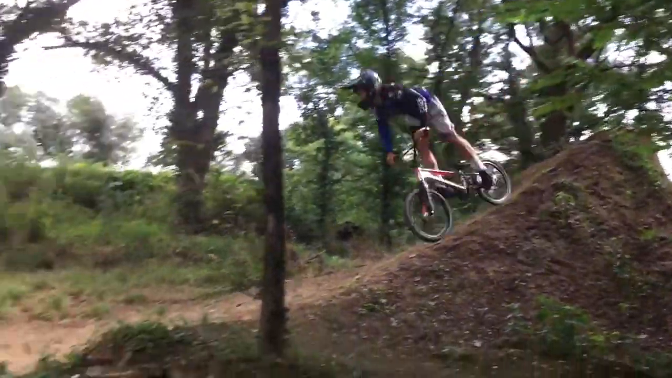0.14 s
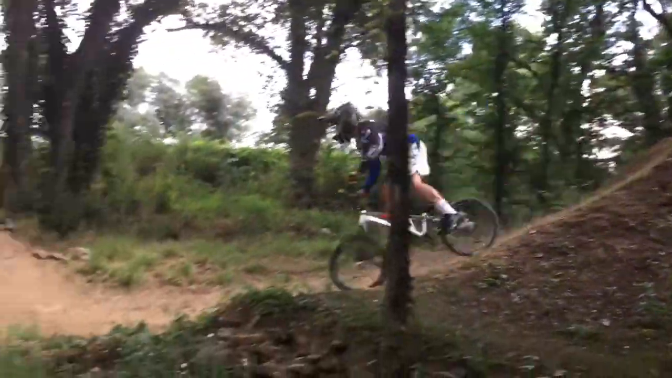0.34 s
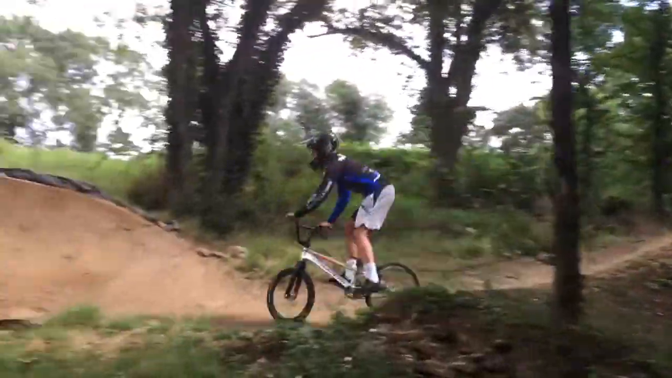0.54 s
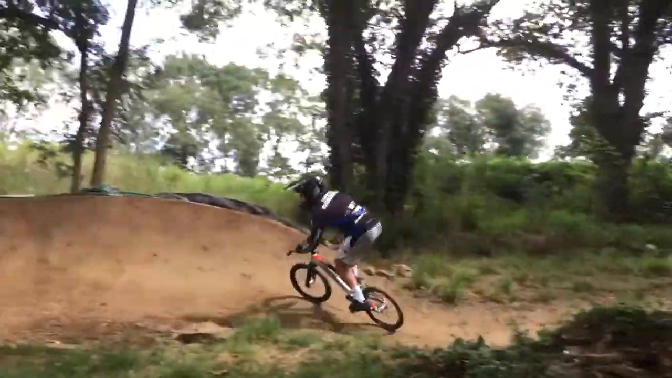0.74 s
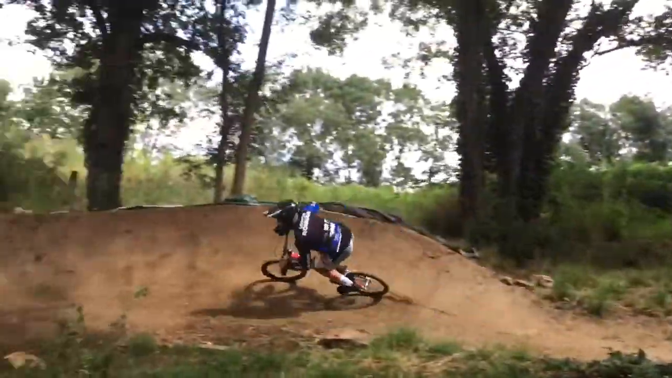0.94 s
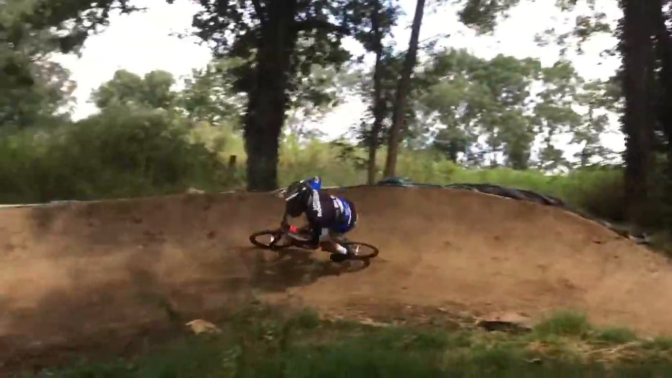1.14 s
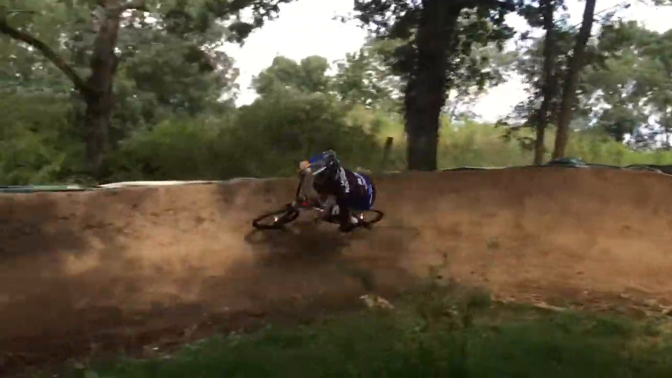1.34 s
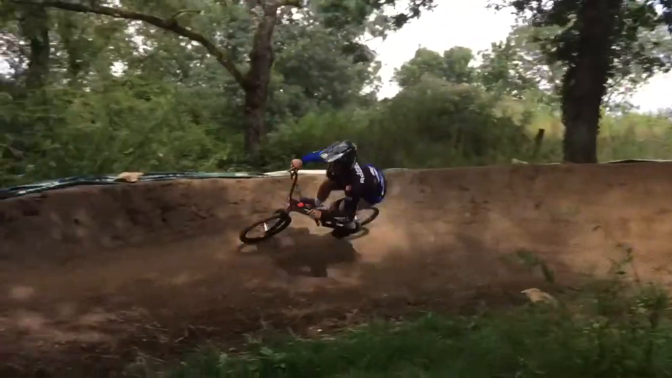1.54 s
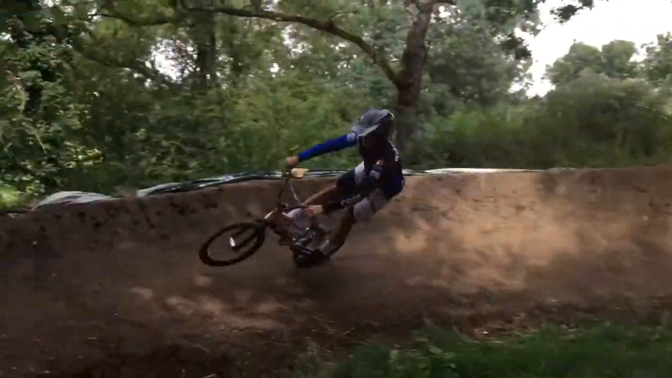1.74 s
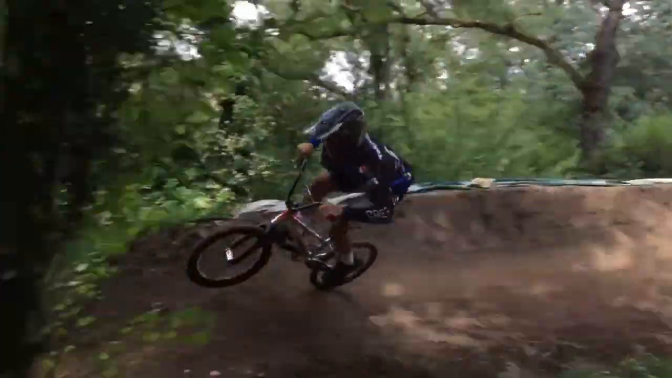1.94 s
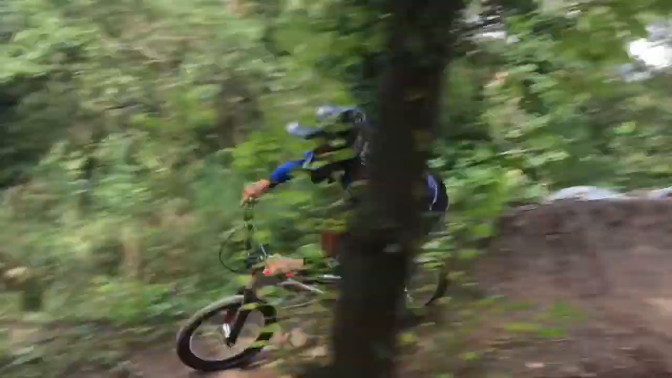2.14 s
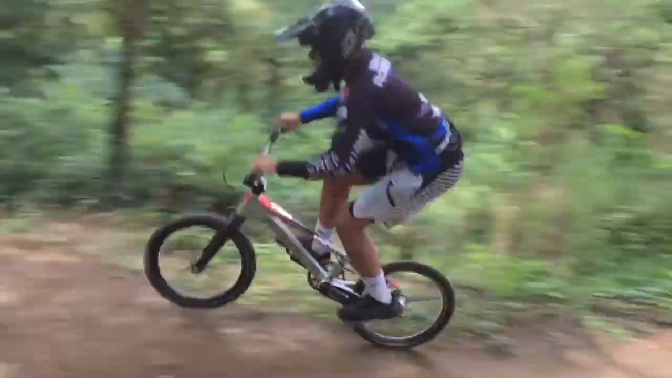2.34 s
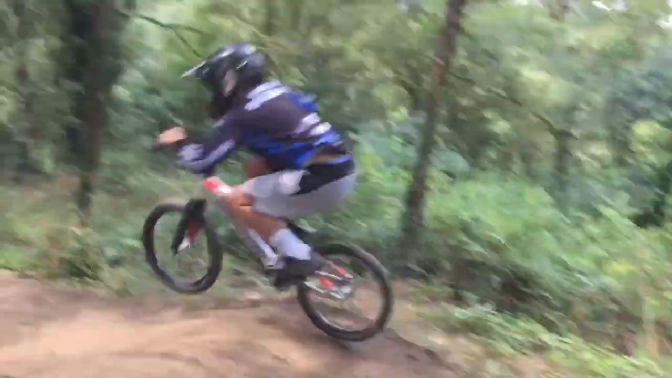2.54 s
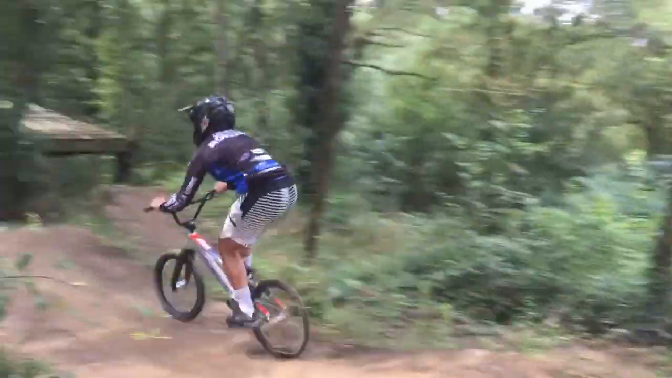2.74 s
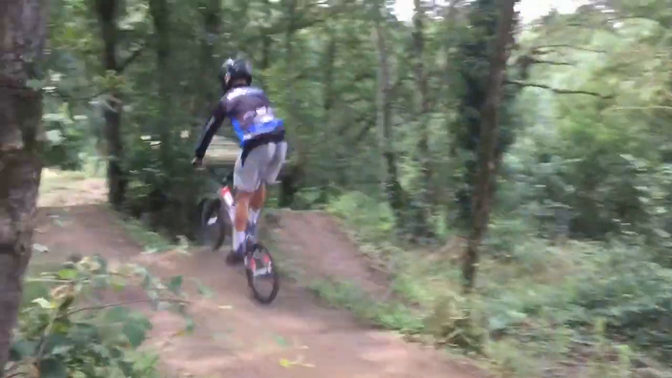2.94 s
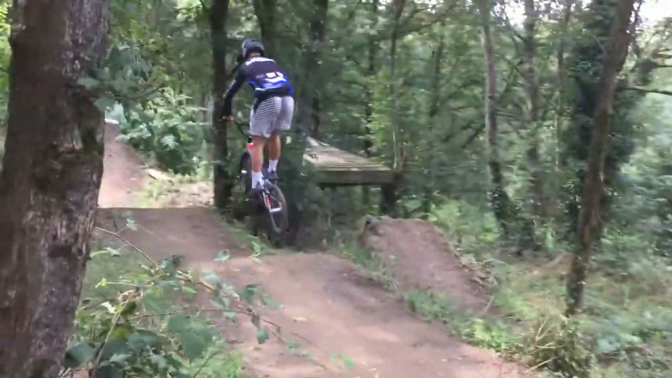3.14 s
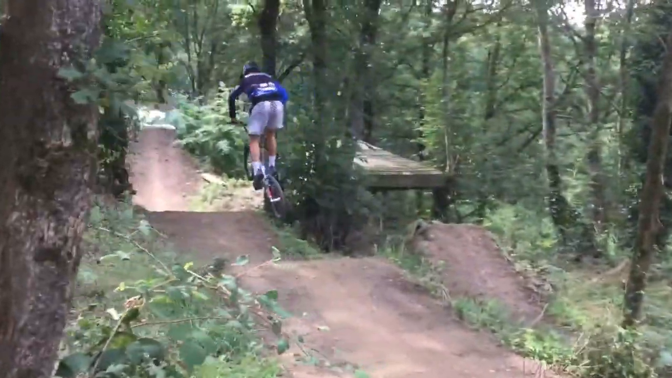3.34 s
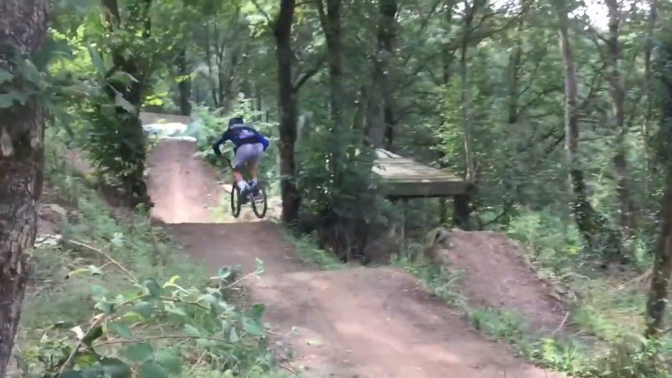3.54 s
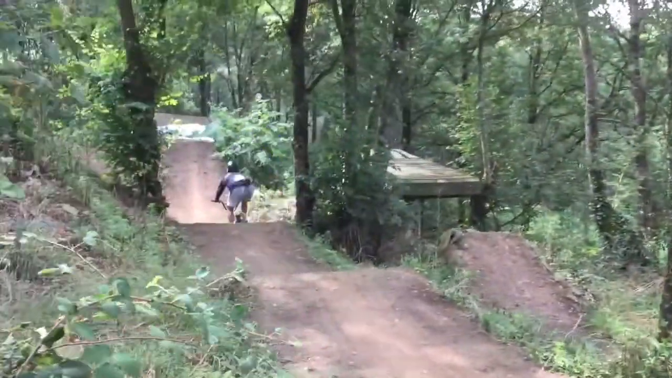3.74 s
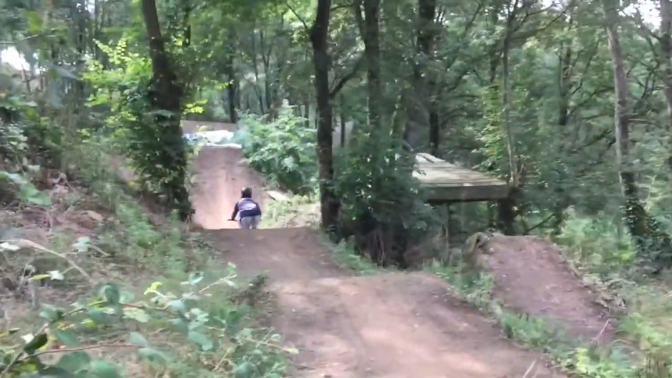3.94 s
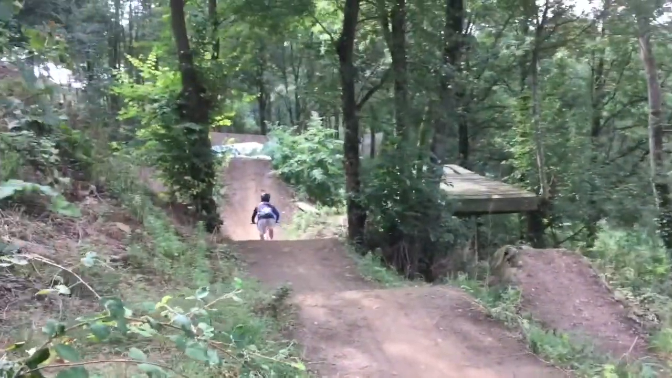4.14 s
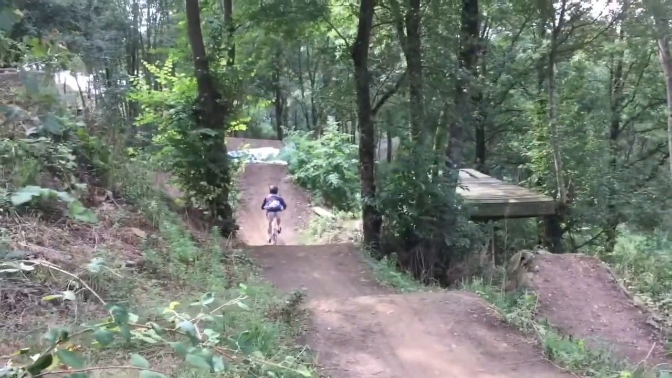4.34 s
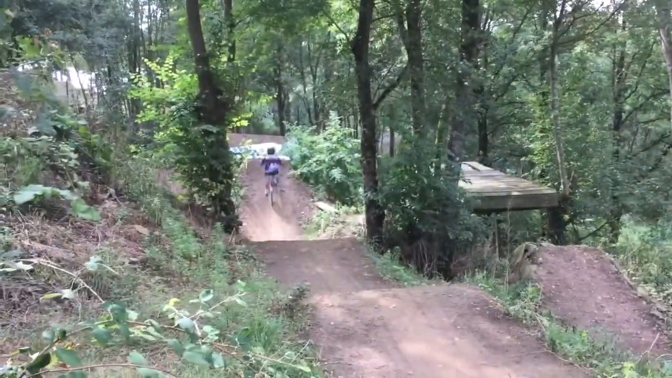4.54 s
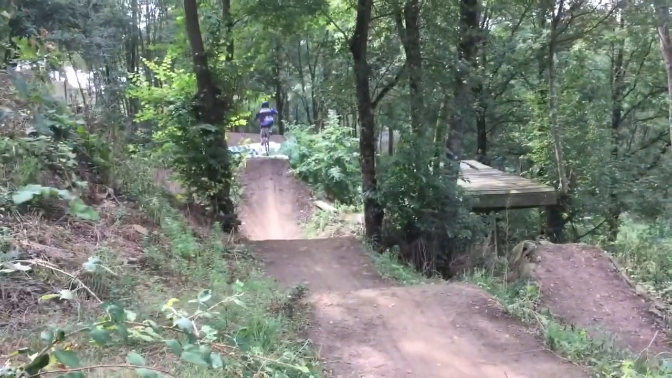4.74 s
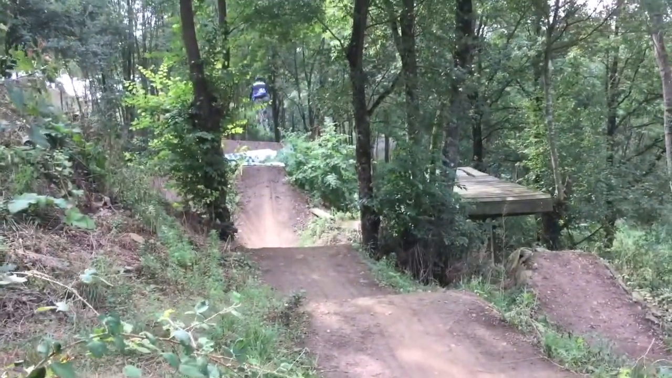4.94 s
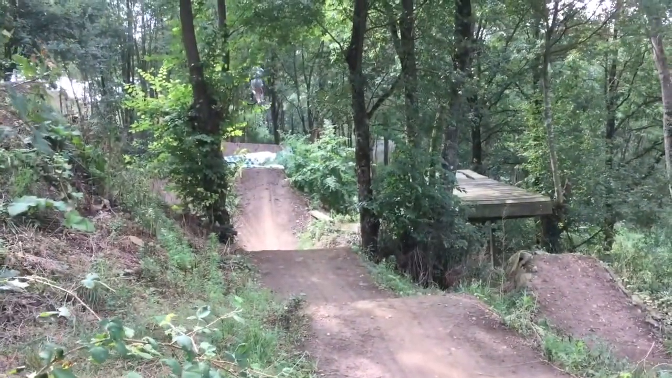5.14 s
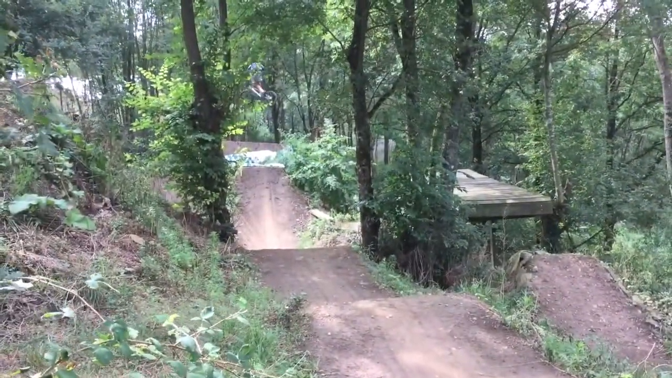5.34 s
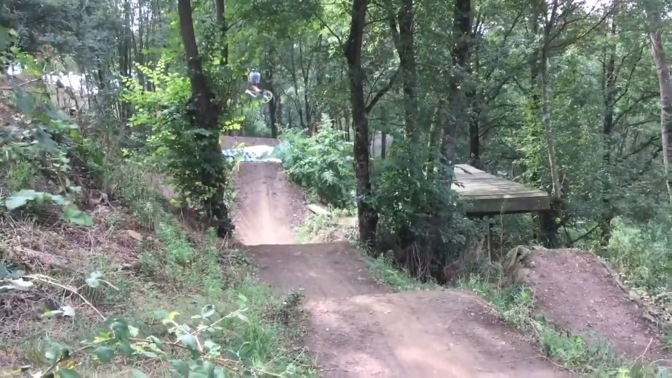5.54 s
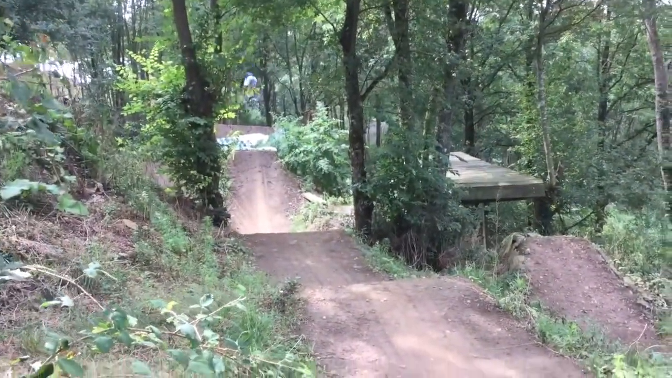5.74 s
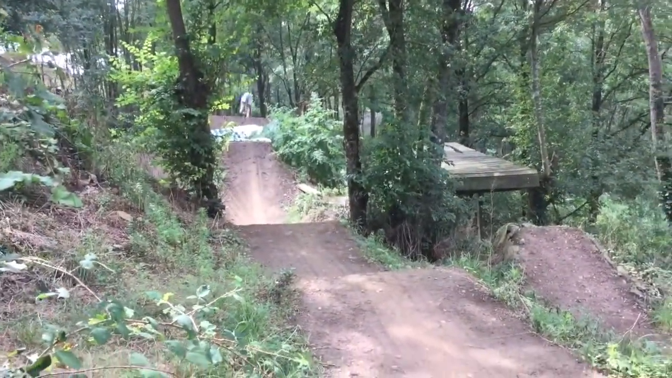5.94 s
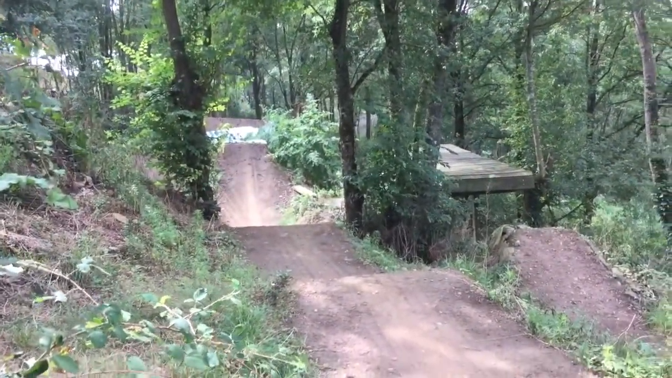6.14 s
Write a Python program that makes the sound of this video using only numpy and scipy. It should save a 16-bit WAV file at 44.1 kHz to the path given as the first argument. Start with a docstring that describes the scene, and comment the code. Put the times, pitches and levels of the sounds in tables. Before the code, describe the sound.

In a quiet wood, a mountain bike approaches with a faint freewheel buzz, lands with a low thud, and rumbles over packed dirt as chain and frame knock. It surges past the close microphone with bright ratcheting and gritty hiss, touches down again more faintly as it leaves, then fades away. Near silence follows, with small dry snaps and a final growing rustle.

```python
"""A mountain bike coasts in on a buzzing freewheel, its chain rattling, over the quiet of a wood.
It lands, and the tyres rumble on the ground in a broad hiss, strongest as they crunch over grit; bumps
knock the chain and frame, and low thuds swell throughout. It carves a packed-dirt berm, passes close
and coasts away over jumps. Late on something snaps close by, and a rustle grows. Random contacts ring
resonances for most sources; the woods are coloured noise, and the thuds add a low sine to such rings."""
import sys
import numpy as np
from scipy import signal
from scipy.fft import rfft, irfft
from scipy.io import wavfile
from scipy.ndimage import map_coordinates

SR = 44100
rng = np.random.default_rng(int(sys.argv[2]) if len(sys.argv) > 2 else 0)


def dump(signal):
    """Clip the signal to [-1, 1] and save it as 16-bit WAV at the path in sys.argv[1]."""
    limited = np.clip(np.atleast_2d(signal).T, -1, 1)
    pcm = np.round(limited * 32767).astype(np.int16)
    wavfile.write(sys.argv[1], SR, pcm)


def natural_amplitude(level_db):
    """Convert a level in decibels to a linear amplitude factor, elementwise."""
    exponent = np.asarray(level_db, float) / 20
    return 10 ** exponent


N = 276903   # length in samples

# chain and frame knocks: (time [s], strike level [dB], middle modes [dB], high modes [dB])
KNOCK_HITS = [(0.203, -34.5, -18, -16), (0.245, -35, 2, -1), (0.265, -29, -6, -13),
              (0.283, -29.5, -11, -24), (0.437, -50, -22, -14), (0.499, -40, -24, -13.5),
              (0.6, -30, -18, -12), (0.619, -43, -4, -7), (0.669, -46, -16, -19), (0.961, -31.5, -17, -10),
              (1.36, -36, -9.5, -8), (1.429, -25.5, -9.5, -25), (1.523, -28.5, -18, -23),
              (1.587, -39, -14, -16), (1.731, -24, -6.5, -27), (1.736, -31.5, -22, -23),
              (1.948, -32.5, -11, -7), (2.008, -31, -20, -18), (2.099, -37, -19, -16.5),
              (2.191, -33, -3, 3), (2.214, -29.5, -4, -16), (2.285, -27.5, -5, -21), (2.296, -24, -10, -22),
              (2.771, -40, -17, -15), (2.787, -29, 1, -18), (3.131, -35.5, -4, -12), (3.232, -39, -9, -10),
              (3.431, -46, -10, -5), (3.447, -42, -2, 7), (3.763, -30.5, -11, -24),
              (3.778, -39.5, 2.5, -13), (3.789, -39.5, -5, -17), (3.802, -43, -10, -17),
              (4.064, -51, 2, -7), (4.368, -52, -20, -3), (4.597, -54, -17, 10.5), (5.687, -68, -2.5, -17),
              (5.731, -68, -1, -14.5)]
# frame tubes and chain guard: (frequency [Hz], width of each pass [Hz], relative level [dB])
FRAME_MODES = [(620, 780, -46), (840, 295, -2), (1021, 340, -1.5), (1300, 440, -5.5), (1566, 150, -6),
               (1993, 430, 3), (2180, 400, -27), (3150, 380, 2), (3550, 540, -6.5)]


def rms_one(x):
    """Scales a signal to unit power."""
    return x / np.sqrt(np.mean(x ** 2) + 1e-20)


def in_time(rows):
    """Draws each table column as a curve over all samples."""
    s, *columns = np.transpose(rows)
    return [np.interp(np.arange(N) / SR, s, column) for column in columns]


def drift(rate_hz):
    """Slow random wander of rms 1: noise through two equal poles, made at every 40th sample."""
    r = np.exp(-80 * np.pi * rate_hz / SR)
    noise = rng.standard_normal(N // 40 + 2002)
    slow = signal.lfilter([1], [1, -2 * r, r * r], noise)[2000:]   # drops the filter's start
    return np.interp(np.arange(N) / 40, np.arange(len(slow)), rms_one(slow))


def resonance(x, hz, width_hz):
    """Two-pole resonance with gain 1 at its peak."""
    r = np.exp(-np.pi * width_hz / SR)
    poles = [1, -2 * r * np.cos(2 * np.pi * hz / SR), r * r]
    return signal.lfilter([(1 - r * r) / 2, 0, (r * r - 1) / 2], poles, x)


def steep(x, hz, width_hz):
    """A resonance passed twice: soft start, dark flanks."""
    return resonance(resonance(x, hz, width_hz), hz, width_hz)


def body(modes, per_s, spread_db, patchy_db, flicker_hz, ring=resonance, turn=-1):
    """Random contacts ring a set of modes; each swells and fades mostly by itself. Rms 1."""
    sizes = natural_amplitude(spread_db * np.minimum(rng.exponential(1, N), 5)) * rng.choice([-1, 1], N)
    contacts = sizes * (rng.random(N) < per_s / SR) + 1e-18
    together = .3 * drift(flicker_hz)   # the part of the swelling that all modes share
    total = np.zeros(N)
    for k, (hz, width_hz, db) in enumerate(modes):
        gain = natural_amplitude(db + patchy_db * (together + drift(flicker_hz)))
        total += turn ** k * gain * ring(contacts, hz, width_hz)   # turn -1 alternates polarity
    return rms_one(total)


def freewheel(gain_db):
    """Pawls snap over the ratchet too fast to count; motion shifts the pitch of the ringing hub."""
    # hub shell and spokes before the shift: (frequency [Hz], width [Hz], relative level [dB])
    hub_modes = [(2585, 83, -1.5), (3280, 200, -1), (3920, 560, -0.5), (4474, 350, -2), (5380, 470, -6),
                 (6908, 190, 1.5), (8230, 720, -10), (9680, 1300, -12.5), (11080, 520, -4.5),
                 (11950, 940, -7.5), (14200, 450, -0.5), (15200, 1300, -7), (16550, 1300, -6)]
    # gain of the lower rings, as the treble fades faster with distance: (time [s], gain [dB])
    low_ring_gain = [(0, 2), (0.3, -0.5), (1.5, -1), (2.4, 0), (3.2, -4.5), (3.8, 2.5), (4.3, 4.5),
                     (4.85, 8.5), (5.5, 6.5), (6.0, 3)]
    # speed towards the listener: (time [s], speed [m/s])
    closing_speed = [(0, 4.5), (1.2, 3.5), (2.3, 6), (2.9, -3.5), (4.2, -4.5), (6.28, 0)]
    buzz = body(hub_modes, per_s=9000, spread_db=2.0, patchy_db=1.4, flicker_hz=12.0)
    # a small shell sends out no lows
    buzz = signal.sosfilt(signal.butter(2, 1900, "high", fs=SR, output="sos"), buzz)
    lows = signal.sosfilt(signal.butter(1, 4800, fs=SR, output="sos"), buzz)
    buzz = buzz + (natural_amplitude(in_time(low_ring_gain)[0]) - 1) * lows
    # Doppler: the buzz is read faster when closing in, slower when leaving
    reading = np.cumsum(1 + in_time(closing_speed)[0] / 343) % (N - 2)
    return natural_amplitude(gain_db) * map_coordinates(buzz, [reading], order=5)


def rattle(freewheel_db):
    """The slack chain taps the frame at random and rings its lower modes, in step with the freewheel gain."""
    taps = body(FRAME_MODES[1:6], per_s=160, spread_db=3.0, patchy_db=3.0, flicker_hz=10.0,
                ring=steep, turn=1)
    return natural_amplitude(freewheel_db - 15) * taps


def thudding(cavity_db):
    """A low swing of wandering pitch with a little rough noise; each thud swells and fades as a bell."""
    # rough low noise: (frequency [Hz], width [Hz], relative level [dB])
    rough_modes = [(44, 89, 0.5), (108, 134, -6.5)]
    # single thuds: (peak time [s], level [dB], half length to 1/e [s])
    thud_bells = [(0.0, -61, 0.068), (0.115, -59, 0.033), (0.2, -47, 0.012), (0.267, -39.5, 0.024),
                  (0.433, -48.5, 0.018), (0.563, -51.5, 0.029), (0.65, -54, 0.034), (0.77, -55, 0.016),
                  (0.857, -56, .05), (1.055, -56, 0.043), (1.21, -53, .02), (1.272, -46, 0.013),
                  (1.41, -54, 0.03), (1.8, -55, 0.042), (1.853, -52, 0.015), (2.115, -46.5, 0.017),
                  (2.236, -34, 0.022), (2.336, -44.5, 0.022), (2.597, -71, 0.035), (2.78, -45.5, 0.018),
                  (2.87, -55, 0.02), (3.874, -50, 0.018), (4.06, -62, 0.027), (4.353, -64, 0.057),
                  (4.625, -64, .04), (4.79, -64, 0.021), (4.902, -58.5, 0.021), (5.023, -56, 0.017),
                  (5.453, -53, 0.022), (5.54, -61, .02), (5.602, -54.5, 0.022), (5.993, -67.5, .03),
                  (6.078, -65, 0.02), (6.152, -51, 0.0081), (6.173, -50.5, 0.014), (6.21, -58, .02),
                  (6.264, -46, .01)]
    pitch_hz = 76 * (1 + .07 * drift(4.3))
    swing = np.sqrt(2) * np.sin(2 * np.pi * np.cumsum(pitch_hz) / SR)
    rough = body(rough_modes, per_s=300, spread_db=2.5, patchy_db=1.5, flicker_hz=5.0)
    t = np.arange(N) / SR
    level = sum(natural_amplitude(db) * np.exp(-((t - s) / half) ** 2) for s, db, half in thud_bells)
    # between them small random lumps follow the rolling tyres
    level = level + natural_amplitude(cavity_db - 20.5 + 5.5 * drift(4.8))
    return level * rms_one(swing + .6 * rough)


def woods():
    """Leaves and far traffic: coloured noise with a slight slow swell."""
    # spectrum of the background: (frequency [Hz], relative level [dB])
    woods_colour = [(21, -32), (35, 1.5), (139, -9), (166, -14), (365, -18), (1040, -19), (1120, -20),
                    (15500, -38.5)]
    hz = np.maximum(np.fft.rfftfreq(N, 1 / SR), 1)
    table_hz, table_db = np.transpose(woods_colour)
    colour = natural_amplitude(np.interp(np.log(hz), np.log(table_hz), table_db))
    noise = rms_one(irfft(rfft(rng.standard_normal(N)) * colour, N))
    return natural_amplitude(-70 + .7 * drift(0.49)) * noise


def tyres(tread_db, cavity_db, hiss_db):
    """Knobs drum the casing and its air and scuff sideways, under a broad hiss of dense contacts."""
    # knobbly tyre on dirt: (frequency [Hz], width of each pass [Hz], relative level [dB])
    tread_modes = [(507, 144, 3.5), (605, 166, 9.5), (865, 209, 7.5), (1004, 290, 2)]
    # side knobs sliding: (frequency [Hz], width of each pass [Hz], relative level [dB])
    scuff_modes = [(1465, 370, 7), (1810, 163, 6)]
    # air in the tyre: (frequency [Hz], width [Hz], relative level [dB])
    cavity_modes = [(140, 67, -4.5), (197.5, 27.4, 2), (263, 110, -8)]
    # broad hiss: (frequency [Hz], width of each pass [Hz], relative level [dB])
    hiss_modes = [(2464, 2950, 7), (3700, 3050, -1), (6330, 8900, -6)]
    tread = body(tread_modes, per_s=2200, spread_db=3.2, patchy_db=1.5, flicker_hz=16.0,
                 ring=steep, turn=1)
    scuff = body(scuff_modes, per_s=2500, spread_db=3.2, patchy_db=1.5, flicker_hz=16.0,
                 ring=steep, turn=1)
    cavity = body(cavity_modes, per_s=700, spread_db=2.0, patchy_db=1.5, flicker_hz=8.0)
    hiss = body(hiss_modes, per_s=7000, spread_db=2.5, patchy_db=1.3, flicker_hz=12.0,
                ring=steep, turn=1)
    shake = jolts()
    tread_db = tread_db + 1.2 * drift(5.8)   # uneven ground makes the rumble swell and sink
    drumming = (natural_amplitude(tread_db) + natural_amplitude(-23.5) * shake) * tread
    sliding = (natural_amplitude(tread_db - 12) + natural_amplitude(-14.5) * shake) * scuff
    hissing = (natural_amplitude(hiss_db) + natural_amplitude(-18.5) * shake) * hiss
    return drumming + sliding + natural_amplitude(cavity_db) * cavity + hissing


def jolts():
    """Every knock also shakes the tyres: a short envelope that rises fast and dies."""
    rise_s, decay_s = 0.0024, 0.006
    s, strike_db = np.transpose(KNOCK_HITS)[:2]
    hits = np.zeros(N) + 1e-18
    hits[np.round(s * SR).astype(int)] = natural_amplitude(strike_db)
    rise, decay = np.exp(-1 / (rise_s * SR)), np.exp(-1 / (decay_s * SR))
    dying = signal.lfilter([1], [1, -decay], hits)
    return signal.lfilter([1 - rise], [1, -rise], dying)


def knocks():
    """Blunt blows strike every frame mode; where each lands sets its share of middle and high modes."""
    s, strike_db, middle_db, high_db = np.transpose(KNOCK_HITS)
    at, out = np.round(s * SR).astype(int), np.zeros(N)
    chance_db = rng.normal(0, 1.5, (len(at), len(FRAME_MODES)))
    for (hz, width_hz, db), spread_db in zip(FRAME_MODES, chance_db.T):
        share_db = 0 if hz < 1400 else middle_db if hz < 2600 else high_db
        clicks = np.zeros(N) + 1e-18
        clicks[at] = natural_amplitude(strike_db + db + share_db + spread_db)
        to_height_one = np.e * SR / (2 * np.pi * width_hz)   # a click of 1 swells to height 1
        out += steep(clicks, hz, width_hz) * to_height_one
    return out


def echoes(x):
    """A few dull reflections from the ground and the banks."""
    # delayed copies: (delay [s], gain [dB])
    reflections = [(.004, -7), (.0075, -10), (.012, -13), (.019, -18), (.031, -22)]
    dull, out = signal.lfilter([.45], [1, -.55], x), np.zeros(N)
    for delay, db in reflections:
        lag = round(delay * SR)
        out[lag:] += natural_amplitude(db) * dull[:-lag]
    return out


def snaps():
    """Each dry snap close by is a burst of tiny breaks that rings a small object."""
    # bursts: (time [s], burst level [dB], decay [s])
    snap_bursts = [(5.005, -54, 0.0046), (5.01, -57, 0.003), (5.018, -65, 0.004), (6.246, -60, 0.0072),
                   (6.26, -60, 0.0053), (6.2704, -57, 0.0077)]
    # the small object that snaps: (frequency [Hz], width [Hz], gain [dB])
    object_modes = [(2880, 840, 3.5), (3500, 390, 11.5), (4660, 350, 9), (5600, 830, -7), (9550, 640, -1),
                    (10000, 700, 0.5), (12200, 900, -1), (13400, 330, -1.5)]
    burst, noise = np.zeros(N) + 1e-18, rng.standard_normal(N)
    for s, db, decay in snap_bursts:
        t = np.arange(N) / SR - s
        burst += natural_amplitude(db) * (t > 0) * np.exp(-np.abs(t) / decay) * noise
    return sum(natural_amplitude(db) * resonance(burst, hz, width_hz) for hz, width_hz, db in object_modes)


def rustle():
    """Dense small contacts that grow steadily louder."""
    # rustling matter: (frequency [Hz], width of each pass [Hz], relative level [dB])
    rustle_modes = [(200, 110, -13), (596, 640, 6.5), (1520, 1200, 3), (2630, 500, 7.5), (3700, 830, 2.5),
                    (7000, 1700, -18)]
    start_s, fade_in_s, start_db, db_per_s = 6.12, 0.038, -76.5, 130
    since = np.arange(N) / SR - start_s
    grains = body(rustle_modes, per_s=3000, spread_db=3.0, patchy_db=2.0, flicker_hz=12.0,
                  ring=steep, turn=1)
    return np.clip(since / fade_in_s, 0, 1) * natural_amplitude(start_db + db_per_s * since) * grains


def scene():
    """Sums all sources at one microphone, the same in both channels."""
    # freewheel, and a broad hiss that comes and goes with the bike, strongest as the tyres crunch
    # over grit: (time [s], freewheel gain [dB], hiss gain [dB])
    coasting = [(0.0, -57, -64), (0.17, -53, -57), (0.23, -53, -49.5), (0.27, -50, -46.5),
                (0.44, -41, -47.5), (0.53, -47.5, -46.5), (0.77, -46.5, -50), (0.91, -49.5, -49),
                (1.25, -48.5, -49), (1.6, -45, -49.5), (1.88, -43.5, -47.5), (1.91, -47, -48),
                (1.935, -41, -50), (1.99, -46.5, -50.5), (2.1, -46, -50), (2.19, -39, -45),
                (2.37, -37.5, -40), (2.53, -39.5, -43.5), (2.58, -37.5, -50.5), (2.75, -39.5, -44.5),
                (2.78, -42, -42), (2.9, -41, -43.5), (3.09, -44.5, -49.5), (3.125, -42.5, -44),
                (3.23, -47, -53.5), (3.36, -51, -54.5), (3.68, -53.5, -57.5), (3.8, -51, -49.5),
                (3.83, -54, -58.5), (3.93, -60.5, -59.5), (4.3, -66, -71), (4.52, -62.5, -58.5),
                (4.63, -59, -48), (4.74, -65, -47), (4.79, -59.5, -58), (4.865, -60.5, -62),
                (4.96, -87, -83.5), (5.4, -94, -90), (5.49, -75.5, -79), (5.7, -76.5, -84),
                (5.96, -82.5, -80), (6.0, -93, -84)]
    # a first stretch in the air, then one list from each touchdown:
    # (time [s], tread rumble gain [dB], tyre cavity gain [dB])
    rolling = [
        [(0.0, -76, -90), (0.165, -76, -79)],
        [(0.18, -54, -54), (0.28, -43.5, -44), (0.42, -42, -47), (0.56, -44.5, -46.5), (0.9, -52, -50.5),
         (0.96, -44.5, -45.5), (1.25, -49, -53), (1.45, -45.5, -46.5), (1.51, -46.5, -41), (1.56, -47.5, -46.5),
         (1.63, -48, -52), (1.78, -43, -44), (1.87, -49, -47.5), (1.92, -53.5, -57), (2.06, -58, -55),
         (2.18, -58, -52.5)],
        [(2.19, -38.5, -37), (2.3, -36.5, -36.5), (2.33, -38.5, -43.5), (2.4, -39, -43.5), (2.49, -46.5, -49.5),
         (2.54, -53, -44), (2.58, -50, -52.5), (2.62, -54, -45.5), (2.72, -73, -70), (2.754, -68, -65)],
        [(2.761, -40, -43.5), (2.92, -43, -48.5), (3.05, -46, -54.5), (3.11, -51.5, -56), (3.14, -46, -60),
         (3.17, -58.5, -65), (3.26, -64, -72), (3.33, -71.5, -79), (3.745, -78, -74.5)],
        [(3.755, -57, -54.5), (3.87, -51.5, -61), (3.91, -60, -64), (3.96, -52.5, -61.5), (4.06, -57, -73),
         (4.23, -64.5, -75), (4.38, -62.5, -75), (4.45, -55.5, -70), (4.55, -47, -58.5), (4.66, -47.5, -53.5),
         (4.76, -51, -68), (4.82, -60, -68), (4.9, -85, -83), (4.97, -88, -92)],
    ]
    freewheel_db, hiss_db = in_time(coasting)
    tread_db, cavity_db = in_time(sum(rolling, []))
    blows = knocks()
    mix = freewheel(freewheel_db) + rattle(freewheel_db) + thudding(cavity_db) + woods()
    mix = mix + tyres(tread_db, cavity_db, hiss_db) + blows + echoes(blows)
    mix = mix + snaps() + rustle()
    return np.array([mix, mix])


def band_limit(x):
    """A steep low-pass at the top of the band."""
    return signal.sosfilt(signal.butter(12, 16340, fs=SR, output="sos"), x)


def record(dry):
    """The housing of the small microphone dips at a few pitches and cuts both ends."""
    # dips of the housing: (frequency [Hz], width [Hz], depth [0-1])
    housing_dips = [(2150, 250, .5), (4950, 300, .35), (10450, 500, .4)]
    for hz, width_hz, depth in housing_dips:
        dry = dry - depth * resonance(dry, hz, width_hz)
    dry = signal.sosfilt(signal.butter(2, 33, "high", fs=SR, output="sos"), dry)
    dry = signal.sosfilt(signal.ellip(12, .5, 60, 15720, fs=SR, output="sos"), dry)
    return band_limit(dry)


dry = scene()
out = record(dry)
dump(out)
```